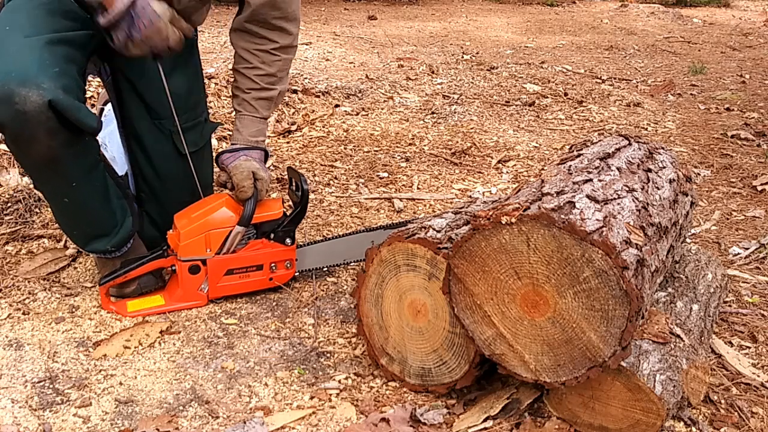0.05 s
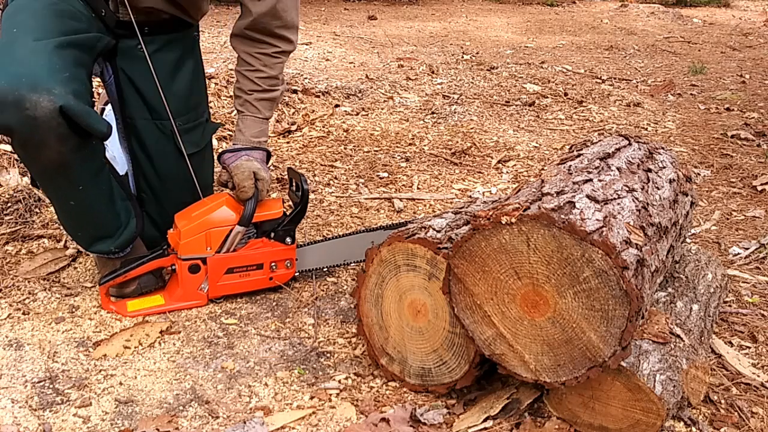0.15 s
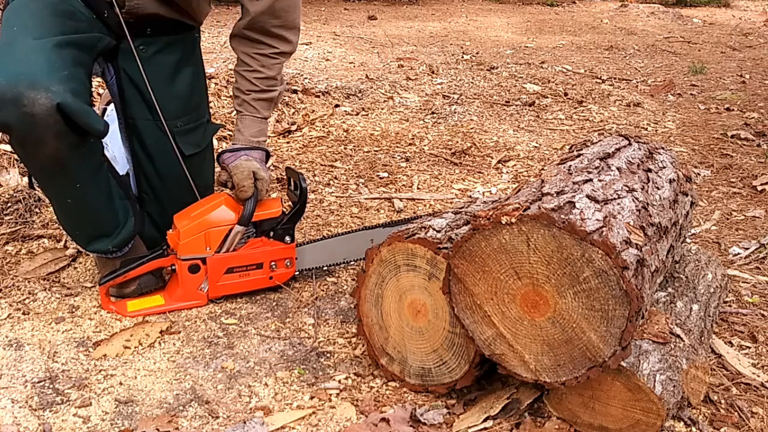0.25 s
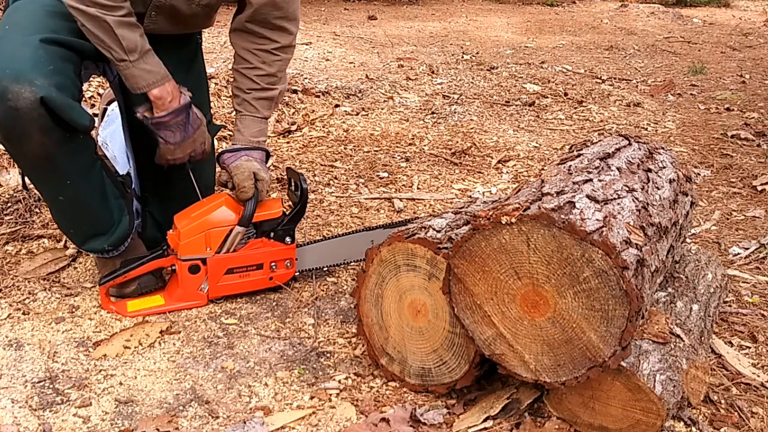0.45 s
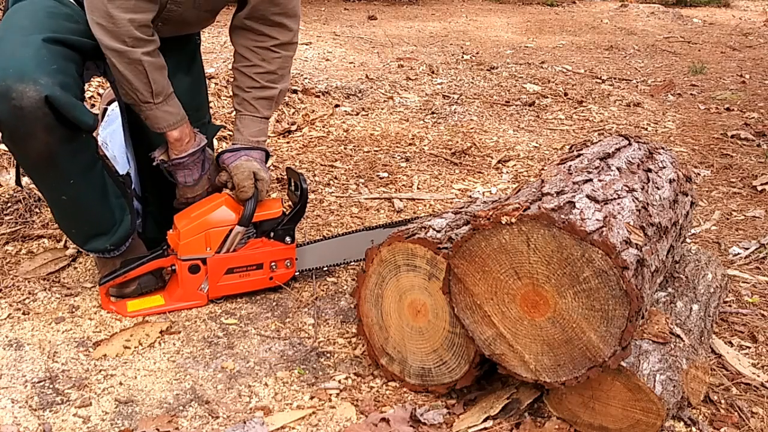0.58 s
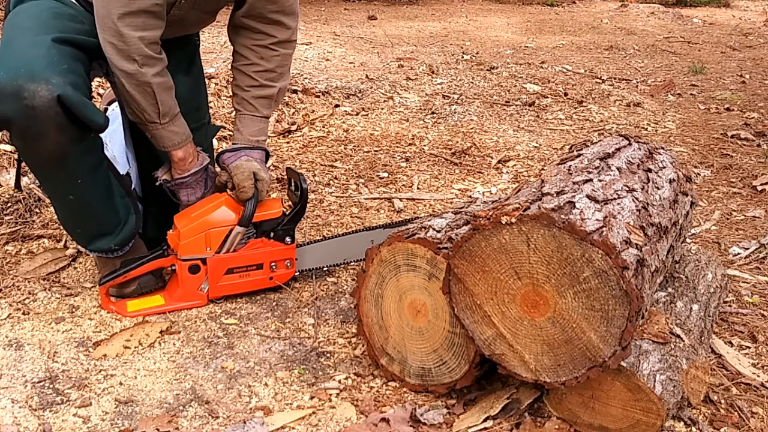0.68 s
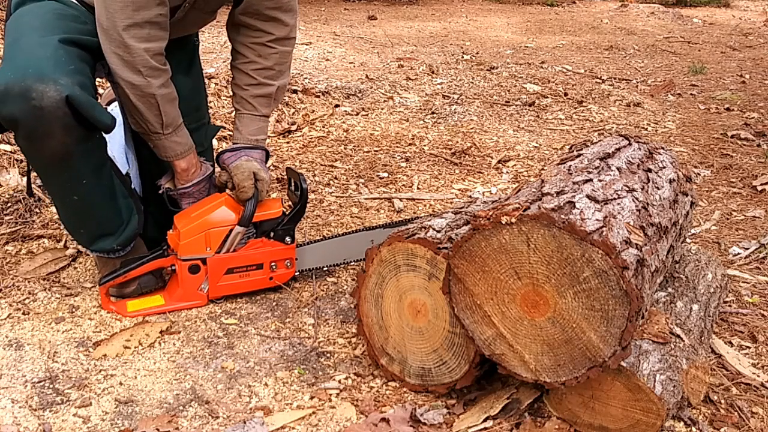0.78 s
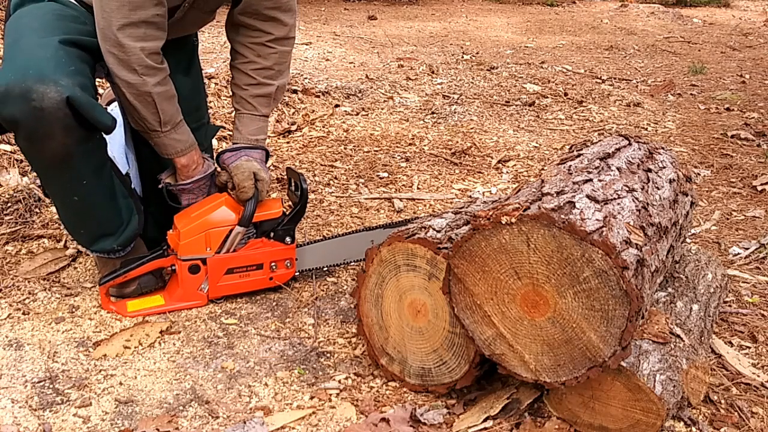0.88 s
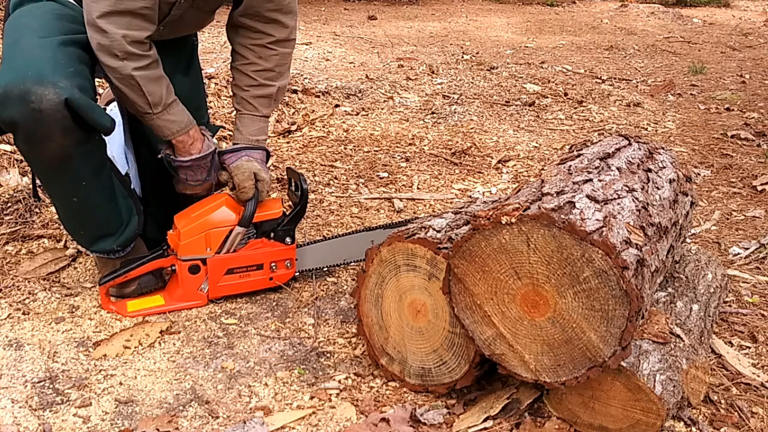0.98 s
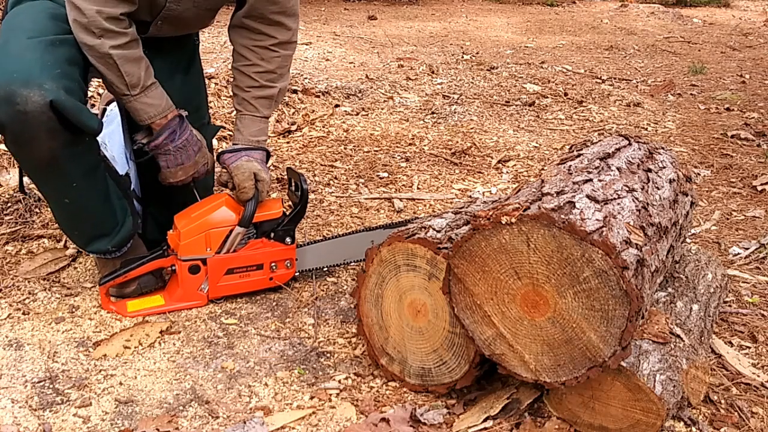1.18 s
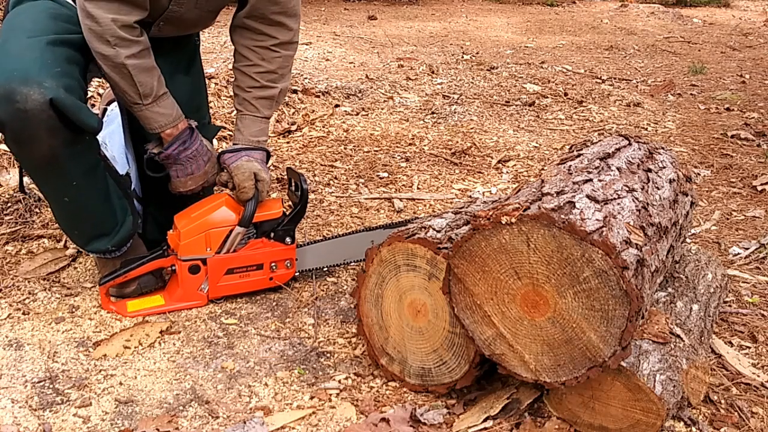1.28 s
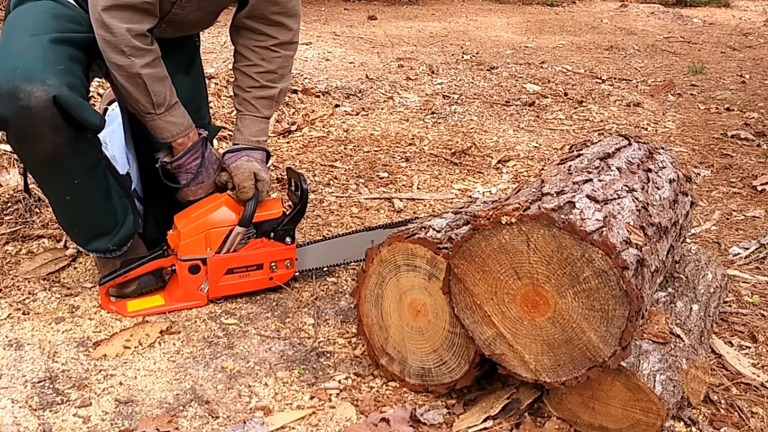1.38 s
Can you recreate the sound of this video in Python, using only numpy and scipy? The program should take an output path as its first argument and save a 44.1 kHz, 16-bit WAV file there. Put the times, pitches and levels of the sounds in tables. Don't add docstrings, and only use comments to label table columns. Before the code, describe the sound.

Close outdoor sound of a chainsaw starter pull that fails to fire: rope zips, engine chugs and drops in pitch, pawls clatter and squeal, rope ticks back, handle knocks, then faint birds and distant hiss.

```python
import sys
import numpy as np
from scipy import signal
from scipy.fft import rfft, irfft
from scipy.io import wavfile
from scipy.ndimage import uniform_filter1d

SR = 44100
rng = np.random.default_rng(int(sys.argv[2]) if len(sys.argv) > 2 else 0)


def attenuation_scalar(level_db):
    decades = np.asarray(level_db, float) / 20
    return 10 ** decades


def pcm_store(signal):
    levels = np.round(np.clip(np.atleast_2d(signal), -1, 1) * 32767)
    wavfile.write(sys.argv[1], SR, levels.astype(np.int16).T)


N = 63945
T = np.arange(N) / SR

# [f/Hz, level/dB]
AIR_COLOUR = [(41, -36.5), (70, 2), (1240, -2.5), (2300, -23), (4770, -20), (8060, -25), (9460, -29.5),
              (15300, -39.5), (16400, -39.5)]
# [t/s, level/dB, share of dull body/dB]
ROPE_PULL = [(0, -73, -10), (0.047, -70.5, -8), (.09, -56, -1.5), (0.153, -46.5, 12), (0.187, -56.5, 6),
             (0.212, -33.5, 4.5), (0.26, -31, -4), (0.319, -42.5, 8), (.40, -47.5, 12), (0.449, -54, 9.5),
             (0.474, -53, 16.5), (.50, -53.5, -5.5), (.60, -41.5, -18.5), (.68, -52, -2),
             (0.729, -61.5, 4.5), (0.951, -69.5, 8.5), (1.016, -62, 11.5), (1.089, -60.5, -0.5),
             (1.16, -58, -9), (1.24, -70, 6)]
# [f/Hz, level/dB]
RASP_COLOUR = [(210, -31), (350, -13), (1030, -17), (2190, -16.5), (2450, -13), (5570, -25), (7550, -17.5),
               (12800, -46.5), (16400, -67)]
# [t/s, length/s, from f/Hz, to f/Hz, level/dB]
BIRD_CHIRPS = [(.036, .068, 2550, 3150, -59.5), (.150, .05, 1670, 1645, -40), (.757, .022, 2650, 2950, -59),
               (.797, .016, 2800, 2950, -58), (.755, .015, 4300, 5200, -67), (.81, .02, 3500, 4400, -68),
               (.855, .012, 4700, 5200, -64), (.90, .02, 3300, 3900, -65), (.93, .03, 4300, 5100, -67),
               (1.066, .01, 4150, 4200, -60), (.72, .03, 2900, 3900, -68), (.88, .02, 2500, 2900, -67),
               (.965, .025, 3600, 4400, -69)]
# [t/s, peak level/dB, f/Hz, t60/s]
TOOTH_TICKS = [(0.078, -41.5, 4200, 0.011), (0.093, -49, 4100, .015), (0.116, -49, 5300, .01),
               (0.1907, -38, 7100, 0.016), (0.197, -34, 2700, 0.016), (0.2035, -25.5, 3600, 0.014),
               (0.2367, -24, 4050, .012), (0.2695, -22, 4100, 0.011), (.2700, -23, 2600, 0.0074),
               (.3005, -30.5, 4100, .012), (.3480, -29, 8900, .014), (0.356, -28.5, 4000, 0.0087),
               (0.218, -20.5, 7540, .014), (0.374, -40, 3150, 0.017), (.6000, -46, 13300, .04),
               (0.359, -23, 7300, 0.019), (0.408, -30.5, 6900, 0.027), (0.42, -31, 3200, 0.0047),
               (0.4158, -33, 8800, .012), (0.4225, -35, 7300, 0.026), (0.43, -29, 1800, 0.0083),
               (.5100, -30, 1050, 0.012), (0.514, -27, 8700, 0.017), (0.5167, -32.5, 2806, 0.041),
               (0.5345, -34, 8700, 0.017), (.5450, -24.5, 6300, 0.015), (0.56, -27, 8700, 0.013),
               (0.57, -41, 8500, 0.011), (0.5952, -34, 8700, 0.012), (0.5977, -31, 2700, 0.027),
               (0.652, -29, 8800, .016), (.6545, -40, 6300, 0.0126), (0.68, -42, 2750, 0.023),
               (0.777, -27.5, 8800, 0.0085), (0.7775, -36, 2900, 0.006), (0.784, -40.5, 1774, 0.046),
               (.8275, -51.5, 8000, .008), (0.8432, -46, 3950, 0.03), (0.853, -53.5, 8200, 0.0082),
               (1.2030, -53, 1970, 0.0098), (1.0379, -37, 2740, 0.014), (1.039, -40.5, 1700, 0.025),
               (1.0400, -42.5, 520, 0.072)]
# [t/s, peak level/dB, t60/s, brightness/dB]
PAWL_CLACKS = [(0.0796, -36, 0.19, -1), (0.1184, -40, 0.028, 2), (0.1324, -38.5, 0.24, 5),
               (0.203, -22, 0.058, -9.5), (0.2147, -14.5, 0.023, -2), (0.2379, -16, 0.02, 2.5),
               (0.269, -13.5, 0.055, -4.5), (0.3003, -16, 0.021, -8.5), (0.3461, -10, 0.03, 0),
               (.3530, -22, 0.015, 6), (0.372, -24.5, 0.059, 0), (0.3737, -32, 0.073, 6),
               (0.4032, -20.5, 0.046, -1.5), (0.408, -28.5, 0.022, 3.5), (0.469, -45, 0.091, 5),
               (0.417, -23.5, 0.091, -9.5), (0.492, -30, 0.075, -3), (0.496, -23, 0.21, -2),
               (0.5137, -13, 0.073, -3.5), (0.5337, -20, 0.22, 2.5), (0.561, -18.5, 0.099, -4),
               (0.5946, -23, 0.16, 0.5), (.6530, -19, 0.051, -3), (0.683, -47, 0.039, -18),
               (0.7771, -14.5, 0.027, -2), (1.0373, -24, 0.033, -0.5), (1.108, -35, 0.024, -2.5),
               (1.4196, -45, 0.07, 0.5)]
# [f/Hz, level/dB]
CRACK_COLOUR = [(180, -28.5), (300, -4.5), (2090, -5.5), (2780, -6), (4740, -8.5), (8660, 0.5),
                (10600, -18), (13400, -19.5), (16400, -20)]
# [f/Hz, t60/s, level/dB]
HOUSING_MODES = [(520, .04, -5), (1776, .05, -5), (2750, .04, -4), (3600, .025, -5), (5135, .055, -11),
                 (5500, .03, -10), (5873, .05, -10), (6310, .05, -3), (7250, .05, -1), (8590, .022, -3),
                 (10070, .045, -14), (12200, .03, -19), (13400, .028, -20), (15100, .025, -20)]
# [t/s, peak level/dB, f/Hz]
DULL_KNOCKS = [
    (0.081, -39, 850),
    (0.2049, -16.5, 1235),
    (.376, -25, 888),
    (0.426, -26, 886),
    (0.5099, -25.5, 950),
    (0.826, -27, 982),
    (0.8426, -26, 857),
    (1.1258, -50, 301),
    (1.041, -47, 547),
]
# [f ratio, level/dB]
PLASTIC_MODES = [(.55, -1), (.8, 0), (1.15, 1), (1.6, 0), (2.8, -15), (4.1, -19)]
# [t/s, level/dB, f/Hz]
PISTON_PUFFS = [(0.2156, -9, 184), (0.229, -16, 267), (0.249, -8.5, 250), (0.259, -16, 250),
                (0.2795, -12, 216), (0.29, -15, 265), (0.3142, -10, 205), (0.328, -18.5, 233),
                (0.362, -26.5, 193), (.374, -15.5, 144), (0.397, -22.5, 211), (.432, -20.5, 240),
                (.441, -24, 157), (0.477, -29, 250), (0.516, -26.5, 220), (0.533, -29.5, 167),
                (0.548, -36.5, 176)]
# [f/Hz, level/dB]
SHRIEK_MODES = [(3500, -24), (5050, -18), (5450, -11), (5950, -10), (6570, 0), (6770, -5), (7380, 1),
                (7650, -5), (8400, -14)]
# [t/s, hold/s, level/dB, f/Hz]
BRIEF_SQUEAK = (.361, .013, -26, 6220)


def level(x, db):
    return x * attenuation_scalar(db) / np.sqrt(np.mean(x ** 2))


def butter(x, order, hz, kind="low"):
    return signal.lfilter(*signal.butter(order, hz, kind, fs=SR), x)


def colour(x, points):
    hz, db = np.array(points).T
    f = np.maximum(np.arange(1025) * SR / 2048, 1)
    curve_db = np.interp(np.log(f), np.log(hz), db) - 12 * np.maximum(np.log2(hz[0] / f), 0)
    cepstrum = irfft(curve_db * np.log(10) / 20)
    cepstrum[1:1024] *= 2
    cepstrum[1025:] = 0
    return signal.fftconvolve(x, irfft(np.exp(rfft(cepstrum))))[:N]


def ring(x, hz, t60):
    r = np.exp(-np.log(1000) / (t60 * SR))
    return signal.lfilter([1 - r, 0, r - 1], [1, -2 * r * np.cos(2 * np.pi * hz / SR), r * r], x)


def fall(start, t60, hold=0., rise=1 / 2000):
    u = T - start
    return np.clip(u / rise, 0, 1) * attenuation_scalar(-60 * np.clip(u - hold, 0, 3 * t60) / t60)


def grains(per_s, spread_db):
    hit, sign, size = rng.random((3, N))
    size = np.minimum(-np.log(size + 1e-9), 3)
    return level((hit < per_s / SR) * np.sign(sign - .5) * attenuation_scalar(spread_db * size), 0)


def walk(rate):
    k = int(SR / rate)
    steps = np.repeat(rng.standard_normal(N // k + 1), k)
    return 1.2 * uniform_filter1d(uniform_filter1d(steps, k), k)[:N]


def air():
    a, b = (colour(rng.standard_normal(N), AIR_COLOUR) for _ in range(2))
    bass = butter(a, 2, 1500) * attenuation_scalar(0.5 * walk(15))
    treble = (b - butter(b, 2, 1500)) * attenuation_scalar(2.0 * walk(2.5))
    return level(bass + treble, -58.5)


def rope():
    s, db, body_db = np.array(ROPE_PULL).T
    rasp = level(colour(grains(per_s=5400, spread_db=3), RASP_COLOUR), 0.89)
    body = butter(rasp, 2, [280, 900], "band") * attenuation_scalar(np.interp(T, s, body_db) + 6.6 * walk(60))
    edge = butter(rasp, 2, 900, "high") * attenuation_scalar(2.2 * walk(120))
    return (body - edge) * attenuation_scalar(np.interp(T, s, db))


def whistles():
    out = 0
    for s, length, from_hz, to_hz, db in BIRD_CHIRPS:
        u = np.clip((T - s) / length, 0, 1)
        turns = length * (from_hz * u + (to_hz - from_hz) * u * u / 2) + .05 * walk(300)
        swell = attenuation_scalar(db + 2 * walk(250)) * np.sin(np.pi * u) ** .4
        out = out + swell * np.sin(2 * np.pi * turns)
    return out


def ticks():
    push_s = 0.0033
    rough, out = rng.standard_normal(N), 0
    for s, db, hz, t60 in TOOTH_TICKS:
        contact = rough * fall(s, 2 * push_s, push_s)
        tick = ring(ring(contact, hz, max(t60, .004)), hz, 3.2 / hz)
        out = out + attenuation_scalar(db) * tick / np.max(np.abs(tick))
    return out


def pawls():
    snap_rise_s, snap_hold_s, snap_t60_s = .0012, .004, 0.0087
    clack_db, crack_db, housing_db = -15, -1.5, -3.5
    grit = grains(per_s=11000, spread_db=3.5)
    low, high = butter(grit, 3, 4500), butter(grit, 3, 4500, "high")

    def clacks(shape):
        out = 0
        for s, db, t60, bright in PAWL_CLACKS:
            out = out + attenuation_scalar(db) * shape(s, t60) * (attenuation_scalar(-bright) * low + attenuation_scalar(bright) * high)
        return out

    rattle = clacks(lambda s, t60: fall(s, max(t60, .01), 0, snap_rise_s)) * attenuation_scalar(1.5 * walk(200))
    snap = clacks(lambda s, t60: attenuation_scalar(-4) * fall(s, snap_t60_s, snap_hold_s, snap_rise_s))
    touch = [attenuation_scalar(2.5 * walk(30)) for _ in HOUSING_MODES]
    flutter = [attenuation_scalar(1.8 * walk(250)) for _ in HOUSING_MODES]

    def crack(x):
        return butter(colour(x, CRACK_COLOUR), 2, 450, "high")

    def metal(x):
        out = 0
        for k, (hz, t60, db) in enumerate(HOUSING_MODES):
            out = out + (-1) ** k * attenuation_scalar(db) * np.sqrt(t60) * ring(x * touch[k], hz, t60) * flutter[k]
        return out

    cracking = attenuation_scalar(crack_db + clack_db) / np.std(crack(grit)) * crack(snap + rattle)
    ringing = attenuation_scalar(housing_db + clack_db) / np.std(metal(grit)) * metal(snap + attenuation_scalar(3) * rattle)
    return cracking + ringing


def knocks():
    noise, out = rng.standard_normal(N), 0
    for s, db, hz in DULL_KNOCKS:
        def blow(late):
            return 2.5 * np.exp(-((T - s - late) * hz * 7.5 - 1.5) ** 2)

        twice = .7 * blow(0) + 1.4 * blow(1.05 / hz)
        rough = level(butter(noise, 2, [hz / 2, 2 * hz], "band"), 0) * fall(s, .035, .002)
        push = butter(twice, 2, hz / 3, "high") + 0.41 * rough
        plastic = sum(attenuation_scalar(d) * ring(push, hz * r, 0.014 / np.sqrt(r)) for r, d in PLASTIC_MODES)
        out = out + attenuation_scalar(db - 2.0) * plastic
    return out


def piston():
    cycles, tilt = 0.76, 0.033
    gas = level(ring(rng.standard_normal(N), 510, 0.012), -18)
    out = 0
    for s, db, hz in PISTON_PUFFS:
        u = (T - s) * hz
        pulse = np.exp(-(u / cycles) ** 2) * -np.cos(2 * np.pi * (u - tilt))
        out = out + attenuation_scalar(db - 3) * (pulse + gas * np.exp(-(u / 2.8) ** 2))
    return out + attenuation_scalar(-8.5) * ring(out, hz=250, t60=0.031)


def shriek():
    start_s, hold_s, shriek_db, fall_s = .2771, .011, -10.5, .028
    song = 0
    for (hz, db), phase in zip(SHRIEK_MODES, rng.random(len(SHRIEK_MODES))):
        turns = hz * T + phase + .17 * walk(450)
        song = song + attenuation_scalar(db + 2.5 * walk(500)) * np.sin(2 * np.pi * turns)
    chatter = grains(per_s=12000, spread_db=0.64)
    rasp = level(ring(ring(chatter, 6900, 0.0009), 6900, 0.0009), shriek_db - 7.5)
    rasp = rasp + attenuation_scalar(-33) * ring(chatter, 9100, 0.00036)
    env = fall(start_s, fall_s, hold_s) + .3 * fall(start_s, .04)

    s, hold, db, hz = BRIEF_SQUEAK
    squeak = 0
    for ratio, d in [(1, 0), (1.18, -6), (1.37, -9)]:
        turns = hz * ratio * T
        squeak = squeak + attenuation_scalar(db + d + 2 * walk(300)) * np.sin(2 * np.pi * turns + 2 * np.pi * .1 * walk(300))
    return env * (level(song, shriek_db - 4.0) + rasp) + fall(s, .035, hold, .012) * squeak


def scattered(saw):
    tail = (rng.standard_normal(N) * fall(0.0081, t60=0.13, rise=.004))[:SR // 2]
    bright = butter(saw, 1, 500, "high")
    return attenuation_scalar(-20) * signal.fftconvolve(bright, tail / np.sqrt(np.sum(tail ** 2)))[:N]


def scene():
    saw = rope() + ticks() + pawls() + knocks() + piston() + shriek()
    return (air() + whistles() + saw + scattered(saw))[None]


def low_pass(x):
    return signal.sosfilt(signal.butter(12, 16500, fs=SR, output="sos"), x)


def record(dry):
    low_cut = signal.butter(2, 85, "high", fs=SR, output="sos")
    top_cut = signal.ellip(8, .2, 70, 15800, fs=SR, output="sos")
    mix = signal.sosfilt(top_cut, signal.sosfilt(low_cut, dry))
    return low_pass(mix)


dry = scene()
out = record(dry)
pcm_store(out)
```